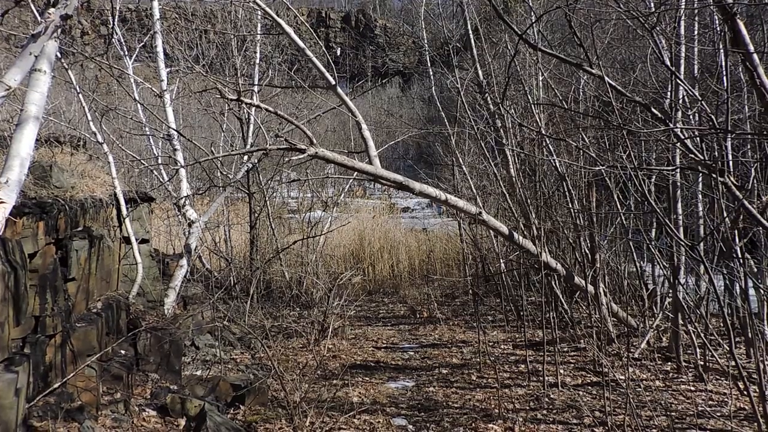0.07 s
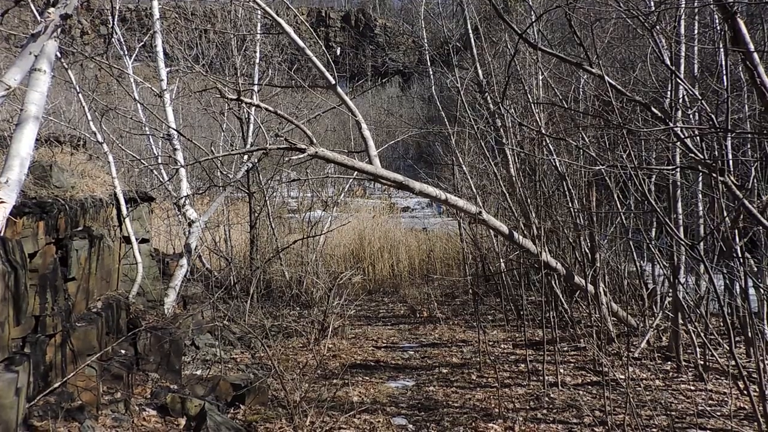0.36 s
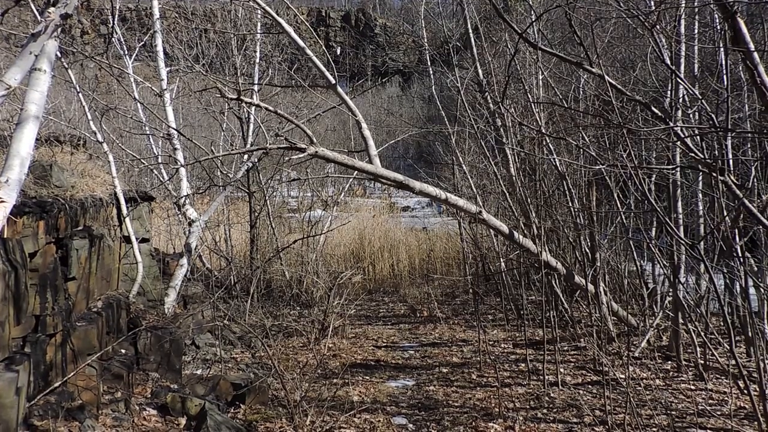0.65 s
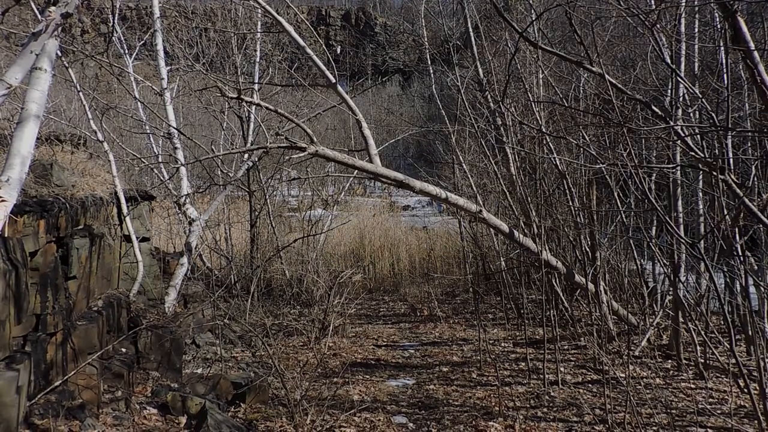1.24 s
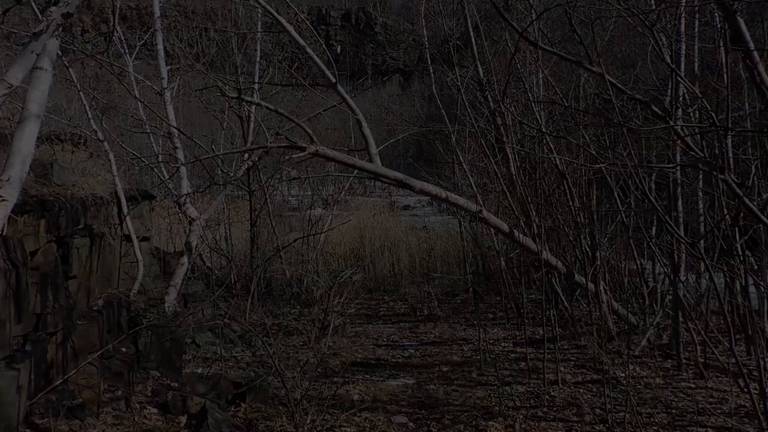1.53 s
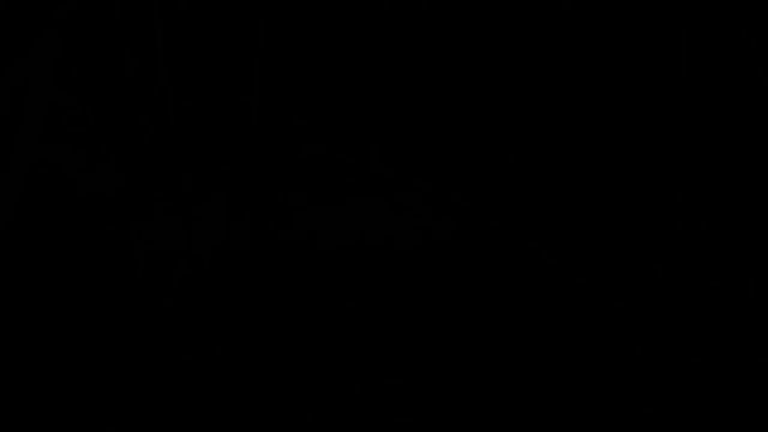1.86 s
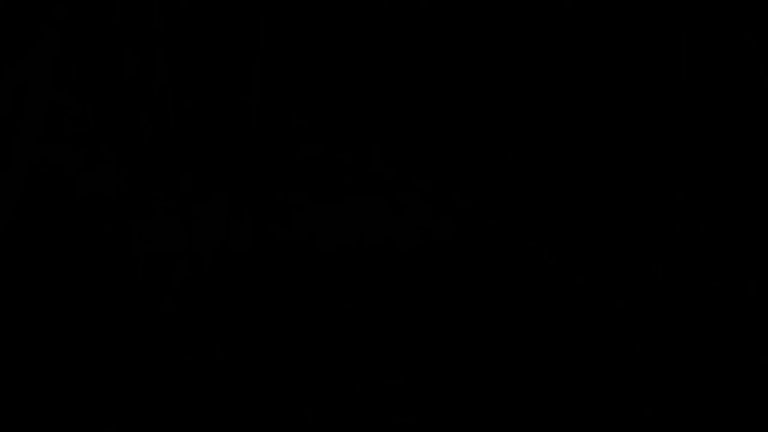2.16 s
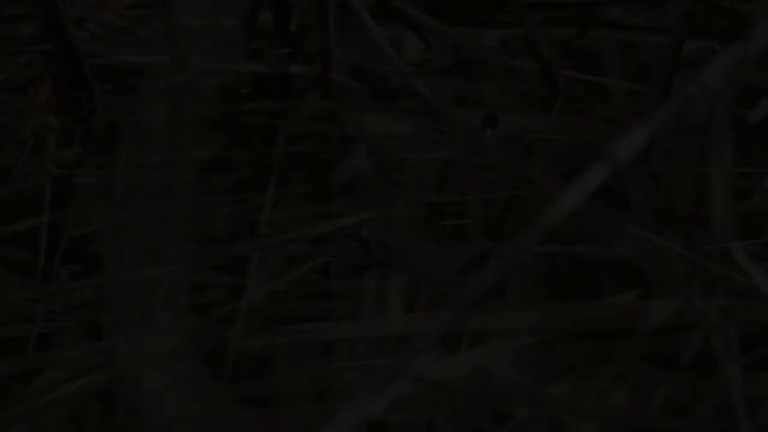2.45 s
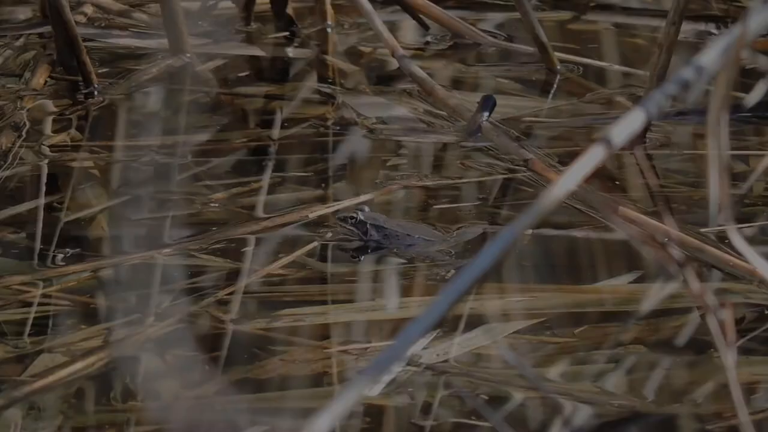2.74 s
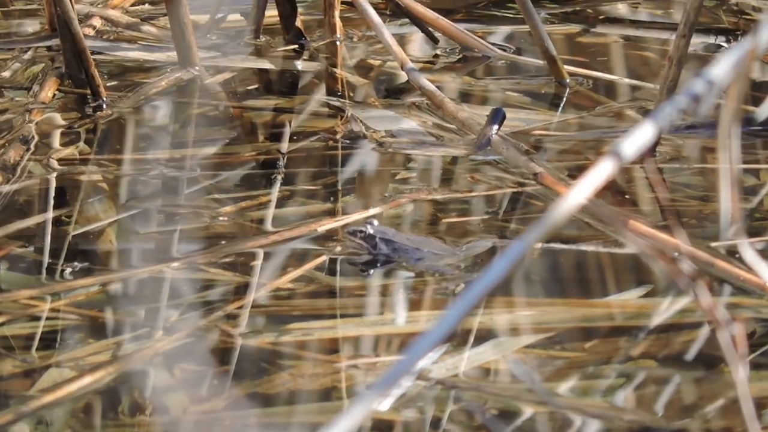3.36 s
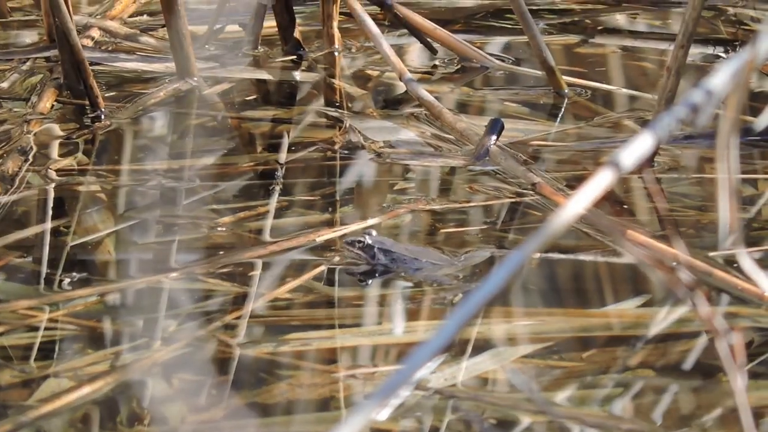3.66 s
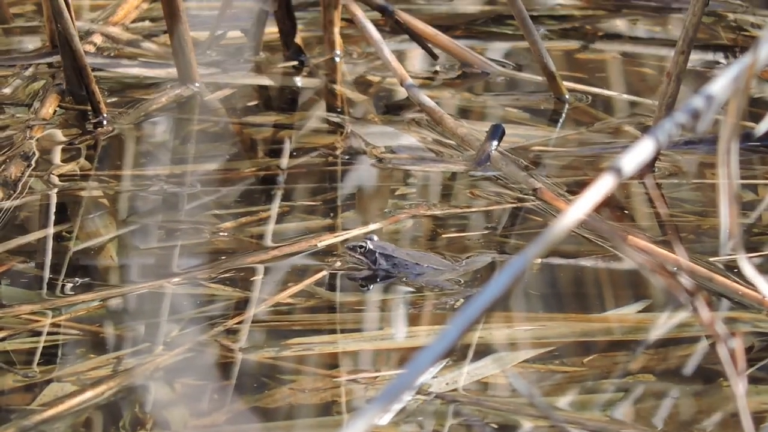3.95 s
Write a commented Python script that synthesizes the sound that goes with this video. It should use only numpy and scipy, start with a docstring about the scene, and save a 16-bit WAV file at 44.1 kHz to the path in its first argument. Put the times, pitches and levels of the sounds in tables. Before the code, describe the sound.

A chorus of frogs gives short, duck-like croaks at a woodland pond, with a light echo and faint low wind. The sound cuts out for a moment, then resumes closer and louder, with a few very faint high chirps.

```python
"""Wood frogs quack at a woodland pond, heard from the trees and then, after a short silence, from the bank.
Each croak is a brief train of larynx pulses ringing two resonances of throat and vocal sacs;
reeds scatter it and the trunks add a tail. More frogs call farther off, louder from the bank.
Underneath lies a bed of faint wind rumble and thin hiss; a few tiny chirps sit on top."""
import sys
import numpy as np
from scipy import signal
from scipy.fft import rfft, irfft
from scipy.io import wavfile

SR = 44100
rng = np.random.default_rng(int(sys.argv[2]) if len(sys.argv) > 2 else 0)


def put_to_file(sound):
    """Save the sound as 16-bit audio at rate SR, in the file named by the first command-line argument."""
    columns = np.atleast_2d(sound).T  # one column per channel
    safe = np.clip(columns, -1, 1)
    whole_steps = np.round(safe * 32767)
    wavfile.write(sys.argv[1], SR, whole_steps.astype(np.int16))


N = 176400

# Cue list of the near frogs: t/s, length/s, level/dB, upper resonance f/Hz, upper over lower/dB
NEAR_CROAKS = [(.022,0.022,-47.5,1470,-10), (.102,0.026,-45,1270,4), (.163,0.024,-44,1480,3),
               (.186,0.017,-48.5,1540,-1), (.261,0.016,-43,1500,-6.5), (.33,0.025,-48,1560,-8),
               (.436,0.021,-44.5,1280,-26), (.519,0.037,-46,1560,2), (.542,0.01,-50.5,1330,9),
               (.622,0.038,-47,1360,0), (.638,0.021,-43.5,1330,11), (.68,.025,-53.5,1950,12),
               (.708,.021,-46.5,1690,3), (.823,0.047,-47.5,1420,4), (.868,.022,-44.5,1800,-2.5),
               (.898,0.038,-46,1350,0), (.963,0.024,-46,1670,2.5), (1.031,0.013,-48.5,1930,-7),
               (1.07,0.016,-47,1420,11), (1.178,0.02,-47.5,1380,-9), (1.199,0.016,-42.5,1430,-1),
               (1.245,0.022,-39,1680,-2), (1.296,0.038,-45.5,1680,-1), (1.322,0.033,-42,1420,11),
               (1.373,0.034,-44.5,1310,3), (1.404,0.023,-48,1500,-7), (1.432,.02,-45,1460,9),
               (1.511,0.038,-50,1550,10), (1.559,0.049,-46,1710,6), (1.594,0.023,-45,1430,4),
               (1.648,.036,-42.5,1460,0.5), (1.688,0.036,-46.5,1560,-2), (1.844,0.021,-45.5,1480,2),
               (1.867,0.036,-44.5,1420,6), (1.897,0.033,-43,1430,-1.5), (1.976,0.035,-47.5,1496,0),
               (2.254,0.033,-41,1400,3), (2.324,.015,-48.5,1300,3), (2.353,0.025,-36.5,1400,2.5),
               (2.408,0.034,-44.5,2010,10), (2.42,0.019,-37,1210,13), (2.443,.021,-41,1730,-1.5),
               (2.508,.012,-42.5,1300,5), (2.57,.017,-36,1690,1.5), (2.608,.015,-45.5,1260,6),
               (2.644,0.033,-41.5,1530,0), (2.664,0.04,-38.5,1550,4), (2.703,.02,-40.5,1250,8),
               (2.745,0.019,-40.5,1620,7), (2.785,0.035,-36.5,1504,2.5), (2.836,0.014,-42.5,1540,1.5),
               (2.881,0.036,-38.5,1580,-2), (2.972,0.043,-40.5,1620,5), (2.984,0.025,-40.5,1830,0),
               (3.01,0.017,-42,1800,-3), (3.051,0.036,-38,1560,2), (3.082,0.036,-44,1300,14),
               (3.121,0.033,-42.5,1250,-1), (3.139,0.019,-40.5,1820,-7.5), (3.181,0.023,-36,1540,3.5),
               (3.258,0.047,-39.5,1620,-2.5), (3.274,0.023,-44.5,2040,8), (3.308,0.024,-39,1640,-3),
               (3.332,0.036,-40.5,1520,0), (3.367,.036,-37.5,1500,16), (3.378,0.022,-46,1950,-4),
               (3.409,0.012,-36.5,1480,6), (3.438,.015,-45,2130,5), (3.467,0.021,-42,1500,6),
               (3.489,0.016,-43.5,1680,1), (3.55,0.035,-38,1544,7.5), (3.578,0.061,-46,1190,6),
               (3.646,0.029,-42.5,1480,-3), (3.683,0.059,-40.5,1350,2), (3.698,0.022,-39,1830,-7),
               (3.738,0.048,-39.5,1350,-2), (3.768,.032,-34,1564,0.5), (3.849,.015,-34,1515,9),
               (3.938,0.031,-35.5,1890,-3), (3.98,0.042,-38,1570,6)]
# Cue list of the high chirps: peak t/s, f/Hz, level/dB
CHIRP_CUES = [(.705, 5000, -68.5), (2.79, 5500, -65), (3.28, 5060, -69), (3.7, 5050, -67),
              (3.775, 4600, -65), (3.942, 5760, -59), (3.98, 5600, -67)]
# Fader ride of the wind rumble: t/s, level/dB
WIND_SWELLS = [(0, -52), (.44, -50.5), (.54, -42.5), (.65, -52.5), (1.45, -52.5), (1.53, -48), (1.85, -51),
               (2.3, -57)]
# EQ curve of the wind rumble: f/Hz, level/dB
WIND_EQ = [(10, -4), (26, 0), (52, -5), (100, -13.5), (200, -24), (500, -37.5), (1500, -72.5)]
# EQ curve of the hiss: f/Hz, level/dB
HISS_EQ = [(30, -2.5), (200, 2), (450, -2.5), (1000, -3.5), (3000, -13.5), (5000, -20), (8000, -23.5),
           (15000, -27.5)]

# Croak tone at each place: lower resonance f/Hz, low cut f/Hz, high cut over upper resonance, ceiling f/Hz
VOICE_TREES, VOICE_BANK = (880, 655, 1.167, 3900), (850, 620, 1.1, 2920)
TREES_END_S, BANK_START_S = 2.048, 2.254


def undb(db):
    """Decibels to gain."""
    return 10 ** (np.asarray(db) / 20)


def pan(db):
    """Left and right gains; negative leans right."""
    return undb(np.array([[db], [-db]]) / 2)


def unit(x):
    """Scale to rms 1."""
    return x / np.sqrt(np.mean(x ** 2))


def resonance(f, hz, width):
    """Response of one resonance, gain 1 at its centre."""
    return 1j * f * width / (hz ** 2 - f ** 2 + 1j * f * width)


def slope(f, hz, kind, order):
    """Response of a high-pass or low-pass filter."""
    return signal.freqs(*signal.butter(order, 1, kind, analog=True), worN=f / hz)[1]


def stereo_noise(eq, width):
    """Mid and side noise shaped by an EQ curve; width is the side gain."""
    hz, db = np.array(eq).T
    f = np.maximum(np.fft.rfftfreq(N, 1 / SR), 1)
    curve = undb(np.interp(np.log(f), np.log(hz), db))
    mid, side = (unit(irfft(rfft(white) * curve, N)) for white in rng.standard_normal((2, N)))
    return np.array([mid + width * side, mid - width * side])


def wind_and_hiss(t):
    """The bed: wind rumbles in slow swells under a steady hiss."""
    rumble = stereo_noise(WIND_EQ, width=0.36) * undb(np.interp(t, *np.array(WIND_SWELLS).T))
    hiss = stereo_noise(HISS_EQ, width=0.82) * undb(np.where(t < TREES_END_S, -58, -58.5))
    return rumble * pan(-2) + hiss


def chirps(t, swell_s=0.013):
    """Faint chirps high above the croaks: narrow bands of noise that swell and fade."""
    f = np.fft.rfftfreq(N, 1 / SR)
    white = rfft(rng.standard_normal((2, N)))
    out = np.zeros((2, N))
    for peak_s, hz, db in CHIRP_CUES:
        band = unit(irfft(white * resonance(f, hz, width=450) ** 2, N))
        out += undb(db) * np.exp(-((t - peak_s) / swell_s) ** 2) * band
    return out


def echo_cloud(t60_s, size, wide_hz=2500):
    """Stereo spectrum of dying echoes off stems and trunks: narrow in the bass, wide in the treble."""
    t, f = np.arange(size) / SR, np.fft.rfftfreq(size, 1 / SR)
    spikes = rng.standard_normal((2, size)) ** 3  # cubed, so single reflections stand out
    echoes = spikes * undb(-60 * t / t60_s) * (1 - np.exp(-t / .004))
    mid, side = rfft(echoes / np.sqrt(np.sum(echoes ** 2, axis=1, keepdims=True)))
    side *= np.minimum(f / wide_hz, 1) ** 2.8
    return np.array([mid + side, mid - side])


def woodland(x):
    """The long reverb tail from the trees round the pond."""
    impulse = irfft(echo_cloud(t60_s=0.8, size=SR), SR)
    return signal.fftconvolve(x, impulse, axes=1)[:, :N]


def far_chorus(per_s=60):
    """Frogs across the pond call at random, blurred by the reeds and the wood."""
    count = int(per_s * N / SR)
    timing, length, loudness, pitch, brightness = rng.standard_normal((count, 5)).T
    starts = (np.arange(count) + timing / 2) / per_s % (N / SR)
    lengths = .028 * np.exp(0.27 * np.tanh(length))
    cues = zip(starts, lengths, 5.5 * np.tanh(loudness), 1407 * np.exp(0.078 * pitch), 3 * brightness - 2)
    calls = croaks(cues, reeds_db=4.5)
    return unit(calls + undb(-10) * woodland(calls))


def larynx(f, rate_hz, length_s, jitter, scatter):
    """Spectrum of a sharp first pulse, a gap, then an uneven train that fades in its second half."""
    periods = np.exp(0.0607 * jitter) / rate_hz
    periods[1] *= 1.9  # the larynx starts slowly
    times = np.cumsum(periods) - periods[0]
    pulse_db = np.interp(times / length_s, [0, .5, 1], [0, 0, -9]) + 1.86 * scatter
    pulse_db[0] = 3.5
    live = times < length_s
    return undb(pulse_db[live]) @ np.exp(-2j * np.pi * np.outer(times[live], f))


def throat(f, pulses, band, lower_hz, upper_hz, upper_db):
    """The pulses ring two resonances of throat and vocal sacs, with a faint rasp on top."""
    def ring(response):
        return response / np.sqrt(np.mean(np.abs(response * pulses) ** 2))  # rms 1 once driven
    lower = ring(band * resonance(f, lower_hz, width=503))
    upper = ring(band * resonance(f, upper_hz, width=380))
    rasp = ring(resonance(f, 5000, width=1500) ** 2)
    return pulses * (ring(lower + undb(upper_db) * upper) + undb(-34.5) * rasp)


def croaks(cues, reeds_db, size=5120):
    """One quack per cue: larynx into throat, scattered by the reeds round each frog."""
    f = np.fft.rfftfreq(size, 1 / SR)
    out = np.zeros((2, N + size))
    for start, length, db, upper_hz, upper_db in cues:
        jitter, scatter, frog = rng.standard_normal((3, 24))
        lag, lean, pitch = frog[:3]  # each frog has its own spot and tuning
        lower_hz, low_cut_hz, cut_ratio, ceiling_hz = VOICE_TREES if start < TREES_END_S else VOICE_BANK
        lower_hz *= np.exp(0.0608 * pitch)
        pulses = larynx(f, .47 * lower_hz, length, jitter, scatter)
        band = slope(f, low_cut_hz, "high", order=7) * slope(f, cut_ratio * upper_hz, "low", order=4)
        band *= slope(f, ceiling_hz, "low", order=5)
        voice = throat(f, pulses, band, lower_hz, upper_hz, upper_db) * undb(db) * np.sqrt(length * SR)
        direct = np.exp(-2j * np.pi * np.outer([0, .0001 + .00004 * lag], f))  # the left ear leads
        reeds = undb(reeds_db) * echo_cloud(t60_s=0.04, size=size)
        ears = voice * (direct + reeds) * pan(lean - 1.5)
        i = int(start * SR)
        out[:, i:i + size] += irfft(ears, size)
    return out[:, :N]


def scene():
    """The same chorus from among the trees, then from the bank, over the bed."""
    t = np.arange(N) / SR
    bed, near = wind_and_hiss(t), croaks(NEAR_CROAKS, reeds_db=-6.5)
    tail, far = woodland(near), far_chorus()

    def mix(near_db, send_db, far_db):
        return undb(near_db) * (near + undb(send_db) * tail) + undb(far_db) * far
    trees = mix(near_db=0.5, send_db=-13, far_db=-54)
    bank = mix(near_db=0.39, send_db=-11, far_db=-47)
    return bed + chirps(t) + np.where(t < TREES_END_S, trees, bank)


def record(dry, ramp_s=.002, top_hz=15750):
    """A hard mute between the two places, and a steep high cut."""
    t = np.arange(N) / SR
    gate = np.clip(np.maximum(TREES_END_S - t, t - BANK_START_S) / ramp_s, 0, 1)
    high_cut = signal.ellip(10, .1, 70, top_hz, fs=SR, output="sos")
    return signal.sosfilt(high_cut, dry * gate)


dry = scene()
out = record(dry)
put_to_file(out)
```